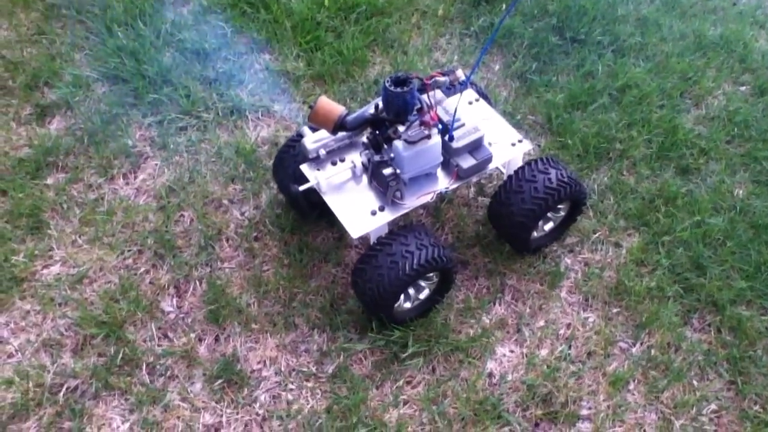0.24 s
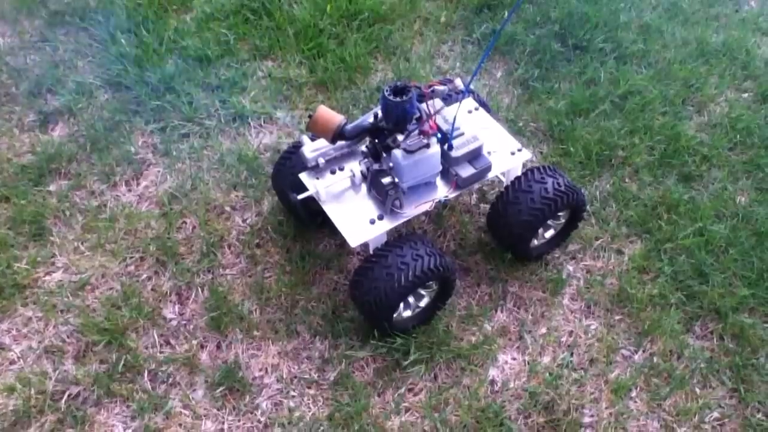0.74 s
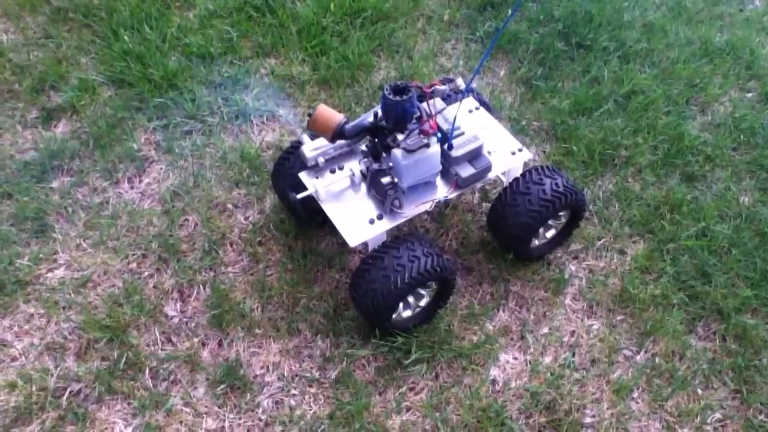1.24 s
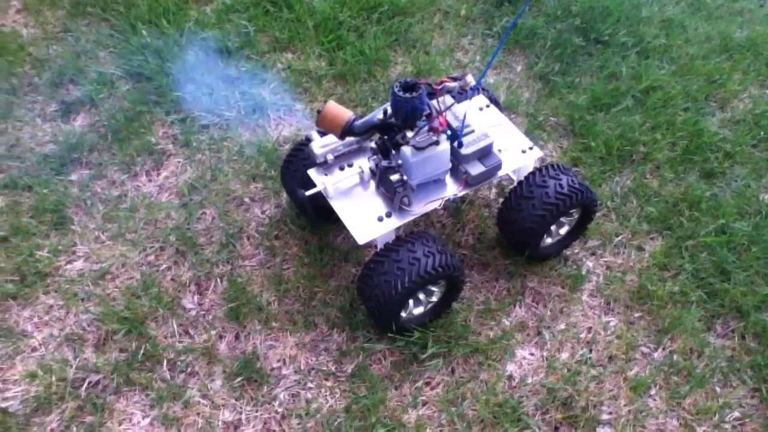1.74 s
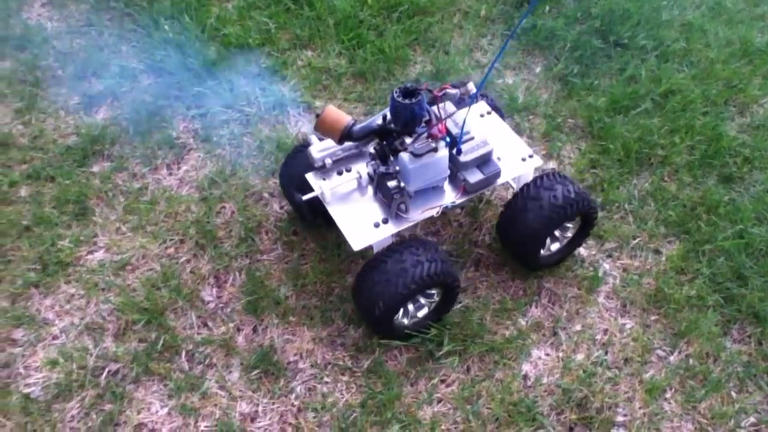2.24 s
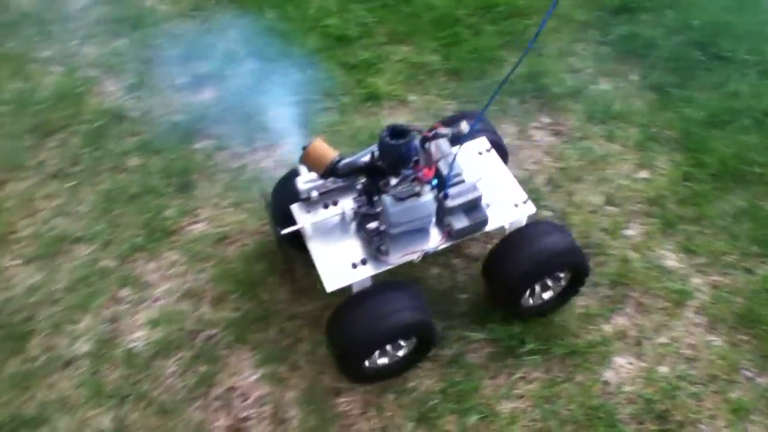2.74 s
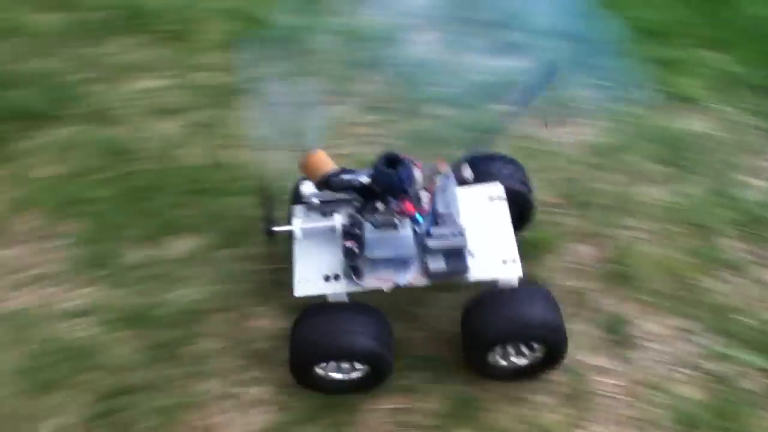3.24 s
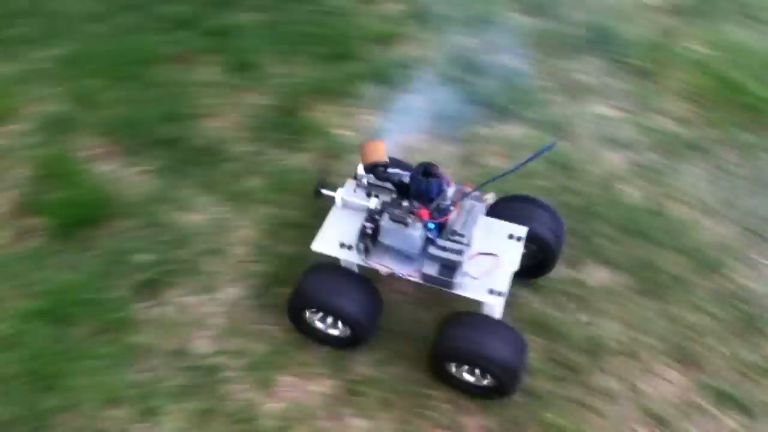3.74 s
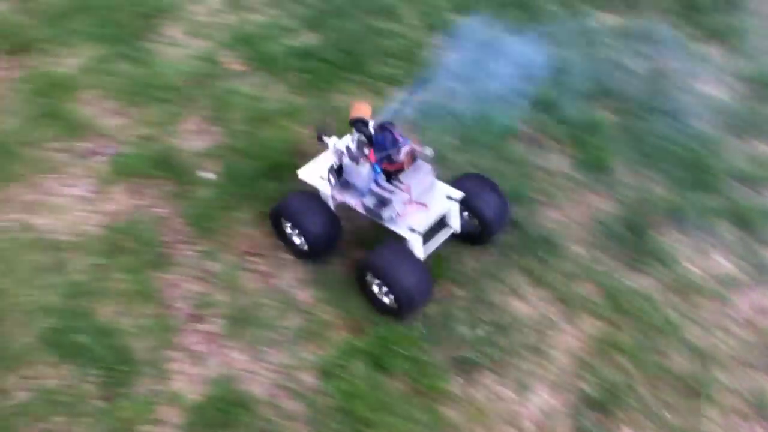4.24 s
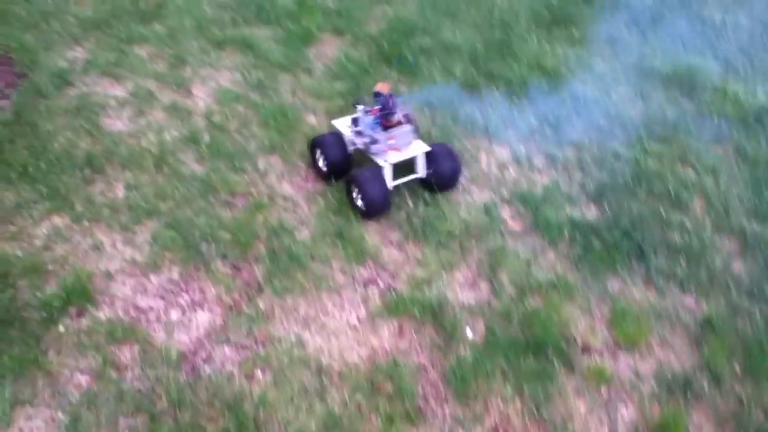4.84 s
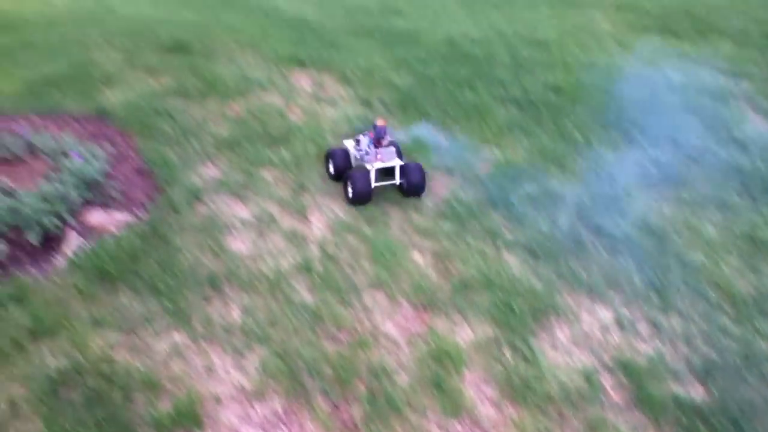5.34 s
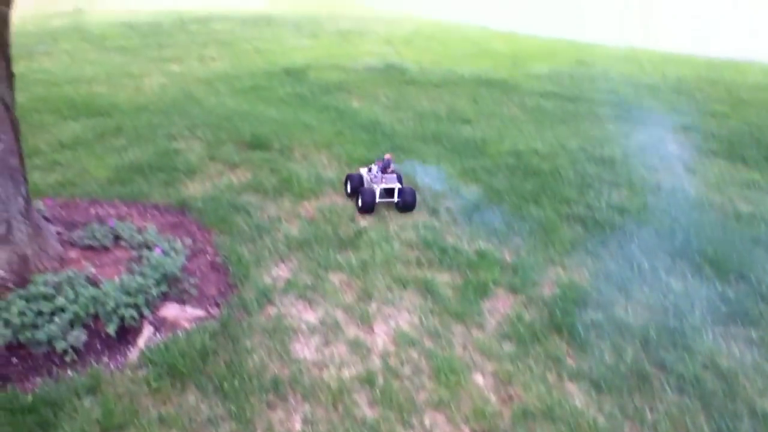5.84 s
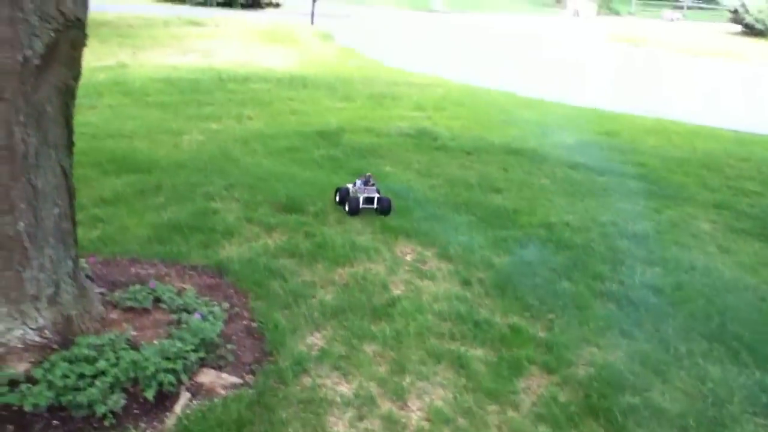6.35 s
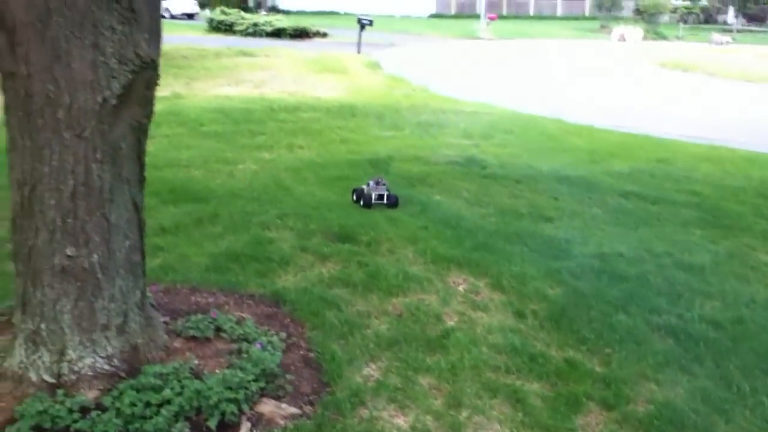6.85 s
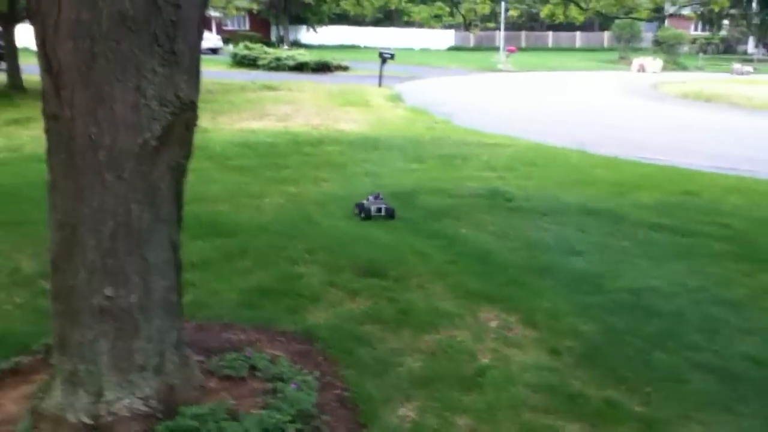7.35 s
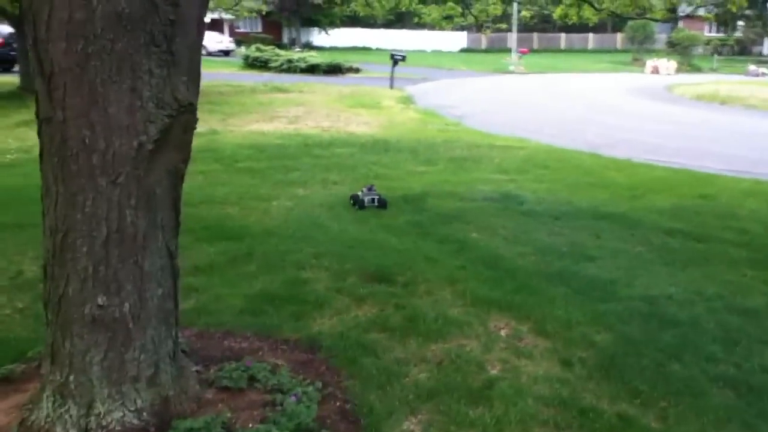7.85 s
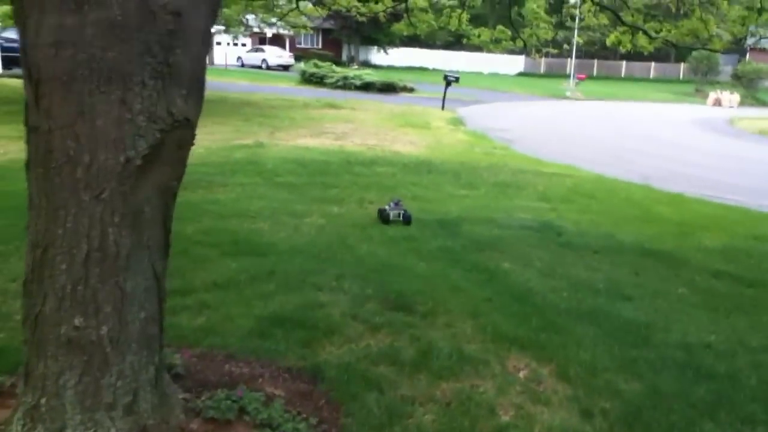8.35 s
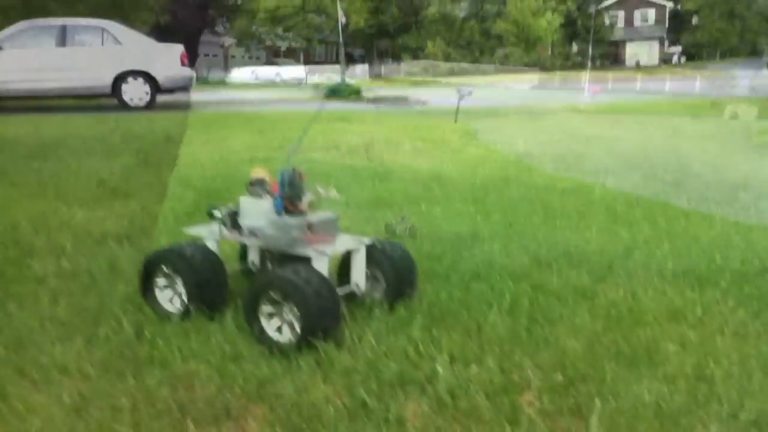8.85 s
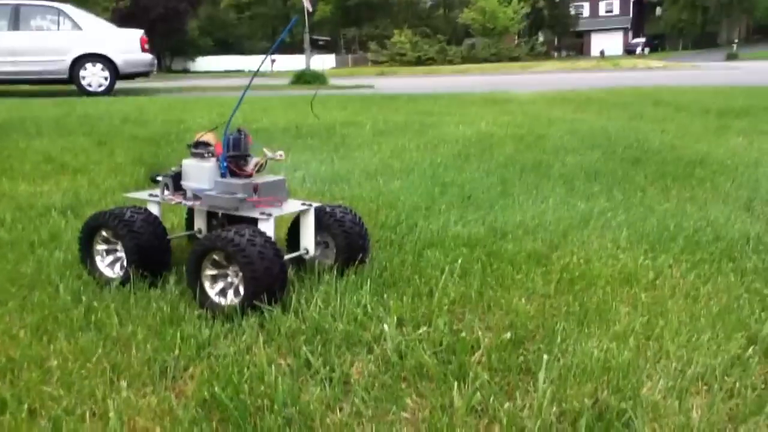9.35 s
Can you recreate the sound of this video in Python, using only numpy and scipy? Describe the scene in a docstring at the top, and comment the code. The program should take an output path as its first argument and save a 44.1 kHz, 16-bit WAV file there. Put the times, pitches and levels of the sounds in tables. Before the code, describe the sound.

A tiny two-stroke model engine buzzes harshly at high revs, swells as it drives past, then drops abruptly to quiet distant idle before idling loudly close by.

```python
"""On a lawn, a propeller-driven model car with a tiny two-stroke nitro engine revs, drives past and away,
and drops to idle; then the idling engine is heard close by. Every firing sends a pulse down the exhaust
pipe, shakes the metal and lets out a rasping jet of gas; their mix depends on the side facing the listener.
The propeller adds blade tones that follow the engine's speed with a lag. A faint outdoor rumble lies below."""
import sys
import numpy as np
from scipy import signal
from scipy.fft import rfft, irfft, next_fast_len
from scipy.io import wavfile
from scipy.ndimage import uniform_filter1d, map_coordinates

SR = 44100
rng = np.random.default_rng(int(sys.argv[2]) if len(sys.argv) > 2 else 0)


def unload_audio(sound):
    """Save the sound as a 16-bit wav file, at the path given as the first command line argument."""
    columns = np.transpose(np.atleast_2d(sound))
    # keep every value between -1 and 1, then stretch to whole-number steps
    steps = np.round(np.clip(columns, -1, 1) * 32767)
    wavfile.write(sys.argv[1], SR, steps.astype(np.int16))


N = 423360  # samples, 9.6 s

# How fast the engine fires. Each row: time in seconds, firings a second.
SPEED = [(0.0, 307.8), (0.61, 316.7), (0.7, 268.7), (0.99, 276.7), (1.31, 313.6), (1.63, 292.4),
         (2.06, 309.7), (2.17, 323.5), (2.65, 350.5), (3.15, 347.7), (3.29, 334.5), (3.61, 355.8),
         (3.64, 348.4), (5.21, 356.3), (5.29, 342.2), (5.43, 355.9), (5.59, 329.9), (5.86, 349.3),
         (6.01, 339.2), (6.09, 307.2), (6.26, 297.6), (6.5, 308.5), (6.63, 294.5), (6.71, 231.4),
         (6.74, 223.4), (6.92, 210.4), (7.03, 234.7), (8.18, 223.4), (8.61, 224.5), (8.85, 235.4),
         (9.3, 235.6), (9.6, 244.4)]
# How the car stands to the listener. Each row: time in seconds, bearing (0 standing, 1 passing,
# 2 turning away, 3 leaving, 4 idling far off, 5 idling close by; values between are a blend).
BEARING = [(0, 0), (3.05, 0), (4.15, 1), (4.45, 1.5), (5.0, 2), (5.38, 3), (6.65, 3), (6.73, 4), (8.55, 4),
           (9.1, 5), (9.6, 5)]
FULL_HZ = 356.1  # firings a second at full throttle


def amp(db):
    """Turn decibels into a gain."""
    return 10 ** (np.asarray(db) / 20)


def unit(x):
    """Scale a sound to an rms of 1."""
    return x / np.sqrt(np.mean(x ** 2) + 1e-20)


def curves(rows):
    """Draw straight lines between the rows: one value per sample for each column after the time."""
    seconds, *columns = np.transpose(rows)
    return [np.interp(np.arange(N) / SR, seconds, column) for column in columns]


def wobble(rate):
    """A smooth random curve through `rate` random points a second."""
    points = rng.standard_normal(int(N * rate / SR) + 4)
    return map_coordinates(points, [np.arange(N) * rate / SR])


def coloured(x, points):
    """Filter x to a (Hz, dB) shape that closes an octave past each end, without pre-ringing, at rms 1."""
    size, closed_db = 4096, -90
    hz, db = np.transpose(points)
    hz = np.r_[hz[0] / 2, hz, hz[-1] * 2]
    db = np.r_[closed_db, db, closed_db]
    bins_hz = np.fft.rfftfreq(size, 1 / SR)
    log_gain = np.log(amp(np.interp(np.log(bins_hz + 1), np.log(hz), db)))
    # folding the cepstrum forward makes the filter respond only after its input
    cepstrum = irfft(log_gain)
    cepstrum[1:size // 2] *= 2
    cepstrum[size // 2 + 1:] = 0
    response = irfft(np.exp(rfft(cepstrum)))
    return unit(signal.oaconvolve(x, response)[:N])


def at_bearing(values, bearing):
    """Glide through one value or curve per bearing."""
    return sum(np.clip(1 - abs(bearing - k), 0, 1) * value for k, value in enumerate(values))


def morph(x, colours, position):
    """Cross-fade through a row of colours as position goes 0, 1, 2, .."""
    return at_bearing([coloured(x, colour) for colour in colours], position)


def blend(clean, noise, share):
    """Mix two unrelated sounds; share is the noise's part of the power, 0-1."""
    share = np.clip(share, 0, 1)
    return np.sqrt(1 - share) * clean + np.sqrt(share) * noise


def engine():
    """Hum, pipe bark, rasp and fizz all follow the same uneven firings, one per turn of the crank."""
    # The engine's loudness at the listener. Each row: time in seconds, level in dB.
    loudness = [(0, -13.5), (.93, -15), (1.08, -13.5), (1.98, -14), (2.01, -15.5), (2.2, -13), (3.15, -14),
                (3.45, -15), (4.45, -15), (4.97, -15.5), (5.12, -16.8), (5.33, -14.5), (6.63, -16.5),
                (6.75, -24.5), (6.88, -26.5), (7.2, -24.5), (8.58, -25.5), (9.15, -15.5), (9.6, -16.2)]
    # One row per bearing: pipe bark in dB, jet rasp in dB, fizz in dB (all relative to the loudness),
    # turbulent share of the bark 0-1, suction pulse as the port shuts 0-1.
    sides = [(-5.5, -4, -8.5, 0.42, 0.22), (-6, -2, -5, 0.87, .02), (-7.5, -2.5, -2.5, 0.94, 1),
             (-4.5, -5, -7, 0.23, .02), (-3.5, -4, -8.5, 0.6, 0), (-3.5, -4.5, -11.5, 0.66, 0.26)]
    # A moment of stuttering on part throttle: start in seconds, end in seconds.
    stutter_span = (6.06, 6.66)
    stutter_db, stutter_uneven_db = 1.5, 0.1  # louder bark, extra spread of the firings' strength
    stutter_jitter = .012  # extra jitter, as a share of the speed
    hunt_share, hunt_per_octave, hunt_rate = .006, .05, 24  # share of speed, more per octave of sag, points/s
    rough_per_octave = 0.23  # the bark breaks up as the speed sags below full throttle
    bark_swell_db, swell_rate = 0.8, 17  # bark's swell off idle, random points a second

    speed, = curves(SPEED)
    level_db, = curves(loudness)
    bearing, = curves(BEARING)
    bark_db, rasp_db, fizz_db, rough, suction = (at_bearing(column, bearing) for column in np.transpose(sides))
    idle = np.clip(bearing - 3, 0, 1)
    sag_octaves = np.log2(FULL_HZ / speed) * (1 - idle)
    t = np.arange(N) / SR
    stutter = ((t > stutter_span[0]) & (t < stutter_span[1])).astype(float)
    stutter = uniform_filter1d(stutter, size=2000)

    # combustion is uneven: the speed wanders and each turn has its own strength
    hunt = (hunt_share + hunt_per_octave * sag_octaves) * wobble(hunt_rate)
    jitter = (.006 + 0.00506 * idle + stutter_jitter * stutter) * wobble(80)
    turns = np.cumsum(speed * (1 + hunt + jitter)) / SR
    luck = rng.standard_normal(N)[turns.astype(int)]
    strength = amp((0.91 + 0.18 * idle + stutter_uneven_db * stutter) * luck)

    bark_db = bark_db + stutter_db * stutter + bark_swell_db * (1 - idle) * wobble(swell_rate)
    rough = rough + rough_per_octave * sag_octaves
    exhaust = hum(turns, speed, luck, bearing, idle)
    exhaust = exhaust + amp(bark_db) * bark(turns, strength, bearing, idle, rough, suction)
    # each firing also shakes the cylinder and the metal deck
    clatter = chassis(firings(turns, strength, scatter_s=.000016), t60=0.031)
    hiss = amp(rasp_db + 0.37 * wobble(90)) * rasp(turns, strength, clatter, bearing)
    hiss = hiss + amp(fizz_db + 0.94 * wobble(130)) * fizz(turns, strength, clatter, bearing)
    swell_db = 1.15 * (0.5 - idle) * wobble(swell_rate)  # vanishes halfway into idle
    return amp(level_db + swell_db) * (exhaust + hiss)


def firings(turns, strength, scatter_s):
    """One short pulse per turn of the crank, each slightly early or late."""
    at = np.interp(np.arange(1, int(turns[-1])), turns, np.arange(N))
    at = np.clip(at + scatter_s * SR * rng.standard_normal(len(at)), 8, N - 10)
    # a windowed sinc places each pulse between samples
    taps = at.astype(int)[:, None] + np.arange(-7, 9)
    offset = taps - at[:, None]
    shape = np.sinc(offset) * np.cos(np.pi * offset / 16) ** 2
    return unit(np.bincount(taps.ravel(), (shape * strength[taps]).ravel(), N))


def jet(turns, strength, fall_db):
    """Gas noise that bursts when the exhaust port opens and fades by fall_db over the turn."""
    return unit(rng.standard_normal(N) * strength * amp(-fall_db * (turns % 1)))


def bark(turns, strength, bearing, idle, rough, suction):
    """A push as the exhaust port opens and a suction as it shuts ring the pipe, amid turbulent gas."""
    # The pipe's ring standing, passing, leaving and idling. Each row: frequency in Hz, level in dB.
    pipe_standing = [(700, -66), (980, -16.5), (1090, -5.5), (1260, -17.5), (1420, -8.5), (1550, 0.5),
                     (1690, -3.5), (1790, -2), (1900, -9.5), (2120, -16), (2500, -37), (3200, -32)]
    pipe_passing = [(700, -50), (1100, -25), (1400, -6), (1600, -4), (1760, 0), (1900, -4), (2100, -3),
                    (2500, -13), (3200, -40)]
    pipe_leaving = [(700, -50), (1080, -26), (1230, -11), (1400, -4), (1540, -4), (1720, 1), (1850, 1),
                    (2100, -6), (2450, -17), (3200, -40)]
    pipe_idle = [(600, -38), (800, -3), (930, -6), (1130, 4.5), (1350, -12), (1580, 4), (1830, 1.5),
                 (2120, 1.5), (2500, -18), (3200, -41)]
    # Turbulence leaving the pipe, under throttle and at idle. Each row: frequency in Hz, level in dB.
    puff_throttle = [(25, -73), (80, -35.5), (170, -20), (260, -25.5), (450, -11), (800, -6.5), (1150, -5),
                     (1550, 1.5), (1800, 2), (2150, 1), (2500, -4), (3200, -20)]
    puff_idle = [(25, -42), (80, -31), (170, -18), (300, -10.5), (550, -12), (820, -14), (1150, -1),
                 (1350, -3.5), (1580, 2), (1900, -2.5), (2150, 1.5), (2500, -6), (3200, -12.5)]
    port_open = 1 / 6  # share of a turn

    push = firings(turns, strength, scatter_s=.000016)
    pull = firings(turns - port_open, strength, scatter_s=.000012)
    pulses = (suction * pull - push) * amp(2.4 * suction)
    pipe_colours = [pipe_standing, pipe_passing, pipe_passing, pipe_leaving, pipe_idle, pipe_idle]
    pipe = morph(pulses, pipe_colours, bearing)
    puff = morph(jet(turns, strength, fall_db=2.5), [puff_throttle, puff_idle], idle)
    return blend(pipe, puff, rough)


def hum(turns, speed, luck, bearing, idle, count=3):
    """The lowest multiples of the firing rate slide through the exhaust's resonances and swell with luck."""
    # How strongly the exhaust sounds at each bearing.
    # Each row: frequency in Hz, level in dB relative to the loudness.
    hum_standing = [(265, -19), (310, -16.5), (530, -22), (620, -15), (700, -14.5), (800, -18.5),
                    (900, -10.5), (1060, -16)]
    hum_passing = [(350, -13.5), (710, -13), (1060, -15.5)]
    hum_turning = [(355, -13.5), (710, -23), (1065, -13.5)]
    hum_leaving = [(300, -15), (345, -16.5), (600, -23.5), (700, -32.5), (900, -23), (1030, -15.5)]
    hum_idle = [(210, -13), (224, -10.5), (238, -18), (460, -21), (700, -24)]
    hum_close = [(240, -11.5), (480, -28), (720, -30.5)]
    colours = [hum_standing, hum_passing, hum_turning, hum_leaving, hum_idle, hum_close]

    surge_db = (0.74 + 0.62 * idle) * uniform_filter1d(luck, size=130) + .5 * wobble(45)
    out = np.zeros(N)
    for k in range(1, count + 1):
        db = at_bearing([np.interp(k * speed, *np.transpose(c)) for c in colours], bearing)
        flutter_db = k * (0.62 + 0.23 * idle) * wobble(70)  # higher tones flutter more
        out -= amp(db + surge_db + flutter_db) * np.sqrt(2) * np.cos(2 * np.pi * k * turns)
    return out


def chassis(x, t60, count=17):
    """Dense metal ringing, even in overall colour, whose fine pattern shifts as car and listener move."""
    t = np.arange(SR // 50) / SR
    place = np.linspace(0, count - 1, N)
    out = np.zeros(N)
    for k in range(count):
        # noise that would fade by 60 dB in t60 seconds, cut off after 20 ms
        modes = rfft(rng.standard_normal(len(t)) * amp(-60 * t / t60))
        ring = irfft(modes / np.sqrt(uniform_filter1d(abs(modes) ** 2, size=11)))
        near = abs(place - k) < 1
        fade = np.cos(np.pi / 2 * (place[near] - k))
        out[near] += fade * signal.oaconvolve(x[near], unit(ring))[:near.sum()]
    return unit(out)


def rasp(turns, strength, clatter, bearing):
    """The harsh middle treble: metal clatter and bursts of exhaust gas, coloured by the car's bearing."""
    # One colour per bearing. Each row: frequency in Hz, level in dB.
    rasp_standing = [(1800, -19), (2500, -19), (2850, -4.5), (3280, -1), (3700, -3.5), (4500, 0.5),
                     (5000, -5), (5600, 1), (6300, -5), (6900, -9), (8000, -13)]
    rasp_passing = [(1800, -41), (2400, -11.5), (2750, -9), (3150, 3), (3600, 6.5), (4200, 0.5), (4600, -1),
                    (5150, 5), (5800, 2), (6900, -0.5), (8000, -19)]
    rasp_turning = [(1800, -30), (2400, -11), (2800, -8), (3400, -6.5), (4100, -3.5), (4700, 1), (5200, -3),
                    (5800, 0.5), (6900, -4), (8000, -34)]
    rasp_leaving = [(1800, -35), (2500, -7), (2750, -7), (3100, -2), (3700, -1), (4200, -2), (4950, -1),
                    (5170, 6), (5400, -1), (6100, 0), (6950, -6), (8000, -30)]
    rasp_idle = [(1800, -45), (2500, -23), (2750, -5.5), (3200, 2), (3800, 1.5), (4300, -1.5), (4900, -0.5),
                 (5600, -2.5), (6500, -5.5), (6900, 0.5), (8000, -26)]
    rasp_close = [(1800, -47), (2500, -1), (2750, -1), (3200, 3), (3800, -1), (4300, 1.5), (4900, 0.5),
                  (5600, -2.5), (6500, -1.5), (6900, -2), (8000, -21)]
    colours = [rasp_standing, rasp_passing, rasp_turning, rasp_leaving, rasp_idle, rasp_close]
    mixed = blend(clatter, jet(turns, strength, fall_db=1.5), share=.68)
    return morph(mixed, colours, bearing)


def fizz(turns, strength, clatter, bearing):
    """The top treble: mostly gas bursts that fade faster within each turn, with a little clatter."""
    # One colour per bearing; turning away sounds as standing. Each row: frequency in Hz, level in dB.
    fizz_standing = [(6000, -30), (7100, -2), (7900, 1), (8600, 0), (10000, -6), (10800, -6), (11600, -11),
                     (12600, -10.5), (13600, -15), (15000, -11), (15800, -13)]
    fizz_passing = [(6000, -30), (7100, -2), (7600, -1), (7820, 3), (8100, 0), (9600, -3), (10800, -7),
                    (11800, -11.5), (12800, -12), (13900, -21), (15500, -19)]
    fizz_leaving = [(6000, -30), (7100, -4), (7800, 1), (8600, -1), (9800, -1), (10700, -5), (11500, -11),
                    (12800, -12), (13800, -22), (15400, -17)]
    fizz_idle = [(6000, -30), (7100, -2), (7400, -2), (7850, 3), (8500, -2), (9600, -4), (10900, -6),
                 (11900, -11), (13000, -13), (14300, -18), (15500, -15)]
    fizz_close = [(6000, -34), (7100, -14), (7850, 6.5), (8500, 0), (9600, -0.5), (10900, 1), (11900, -4),
                  (13000, -6), (14300, -12), (15500, -7)]
    colours = [fizz_standing, fizz_passing, fizz_standing, fizz_leaving, fizz_idle, fizz_close]
    mixed = blend(clatter, jet(turns, strength, fall_db=5.0), share=0.94)
    return morph(mixed, colours, bearing)


def propeller():
    """Blade tones trail the engine's speed and fade out at idle; from behind the lower ones dominate."""
    # Each row: multiple of the blade rate, level in dB from the side, level in dB from behind.
    blade_tones = [(1, -32, 1.5), (2, -13, -1), (3, 3.5, -8), (4, -3, -49), (5, -32, -40)]
    # Each row: time in seconds, how far the propeller is heard from behind 0-1.
    behind_rows = [(0, 0.02), (6, 0.4), (6.2, 0.97), (9.6, 1)]
    full_blade_hz, lag_s = 259.7, .15  # blade passes a second at full throttle, lag
    slip = 1.5  # power of the engine speed that the propeller follows
    full_db, db_per_octave, behind_db = -33, 6.5, -9  # at full throttle, growth with speed, change from behind

    speed, = curves(SPEED)
    bearing, = curves(BEARING)
    behind, = curves(behind_rows)
    step = 1 / (lag_s * SR)

    def trail(x):
        """Follow x with the lag."""
        return x[0] + signal.lfilter([step], [1, step - 1], x - x[0])

    spin = (trail(speed) / FULL_HZ) ** slip
    driven = trail(np.clip(4 - bearing, 0, 1))
    phase = 2 * np.pi * np.cumsum(full_blade_hz * spin * (1 + 0.0047 * wobble(22))) / SR
    tones = np.zeros(N)
    for order, side_db, rear_db in blade_tones:
        tone_db = side_db + behind * (rear_db - side_db) + 2.5 * wobble(14)
        tones += amp(tone_db) * np.sin(round(order) * phase)
    level_db = full_db + db_per_octave * np.log2(spin) + behind_db * behind
    return driven * amp(level_db) * tones


def outdoors():
    """The faint rumble of the neighbourhood: coloured noise with a gently wavering level."""
    # The rumble's colour. Each row: frequency in Hz, level in dB.
    air_colour = [(20, -12), (50, -4), (100, 0.5), (200, 0), (500, -17), (2000, -4), (15000, -56)]
    # Each row: time in seconds, level in dB.
    air_level = [(0, -58.5), (5.5, -59), (7, -51), (8.5, -46.5), (9.6, -50)]
    level_db, = curves(air_level)
    return amp(level_db + 0.68 * wobble(14)) * coloured(rng.standard_normal(N), air_colour)


def scene():
    """Add the sources and send the same sum to both channels."""
    return np.tile(engine() + propeller() + outdoors(), (2, 1))


def record(dry):
    """Round off the highest peaks and keep nothing above the band limit."""
    ceiling, hardness, top_hz = .9, 6, 15750
    held = dry / (1 + abs(dry / ceiling) ** hardness) ** (1 / hardness)
    size = next_fast_len(N + SR // 2)
    passed = np.fft.rfftfreq(size, 1 / SR) < top_hz
    return irfft(rfft(held, size) * passed, size)[:, :N]


dry = scene()
out = record(dry)
unload_audio(out)
```